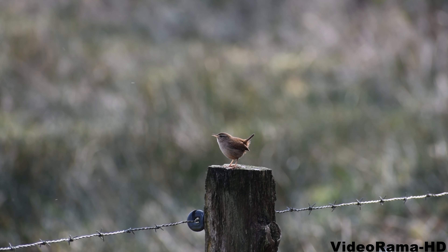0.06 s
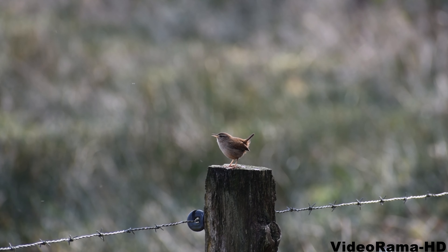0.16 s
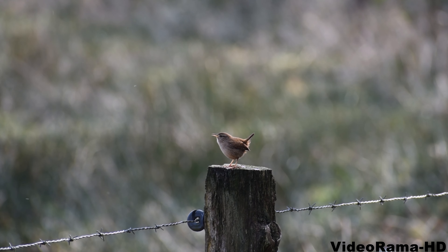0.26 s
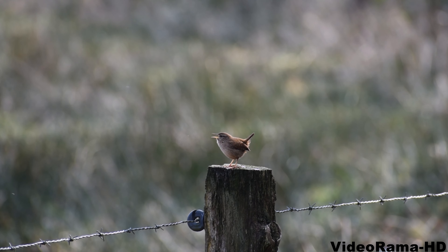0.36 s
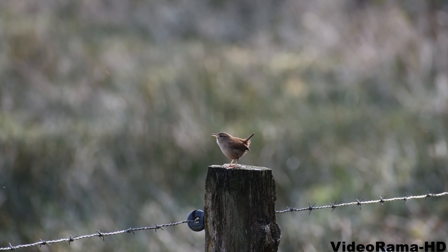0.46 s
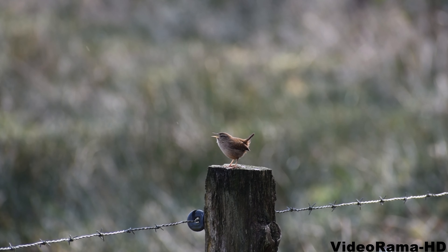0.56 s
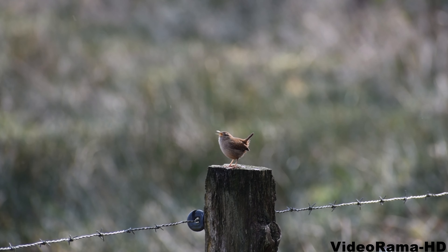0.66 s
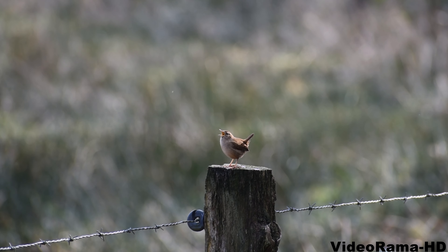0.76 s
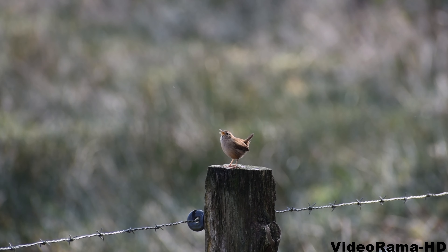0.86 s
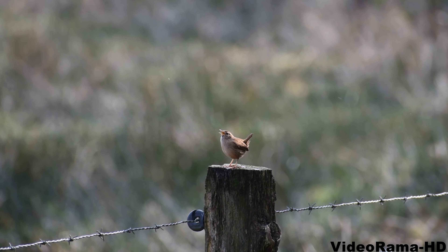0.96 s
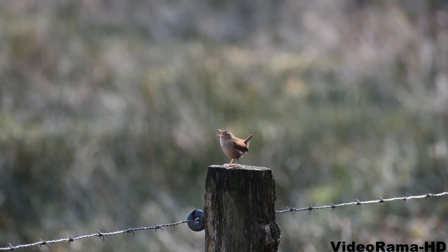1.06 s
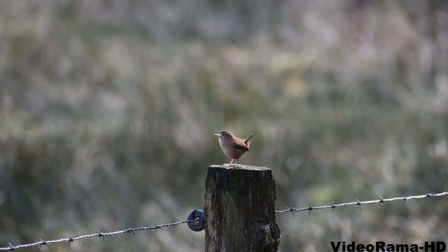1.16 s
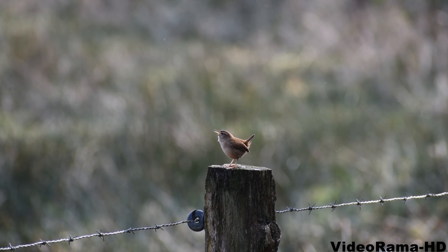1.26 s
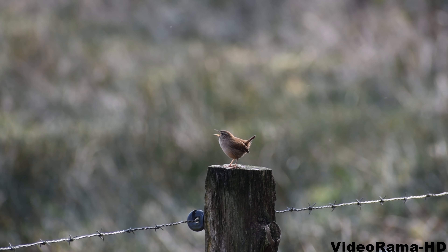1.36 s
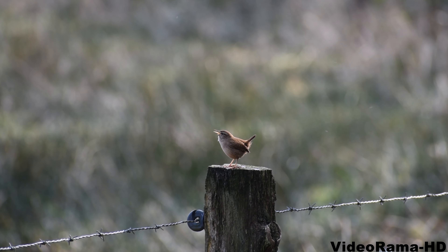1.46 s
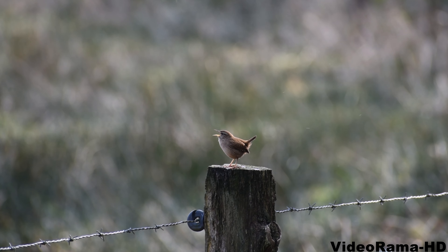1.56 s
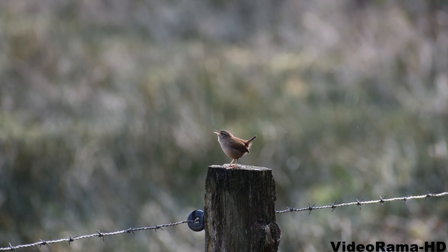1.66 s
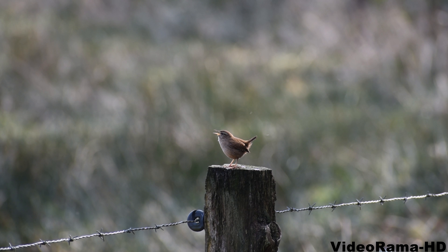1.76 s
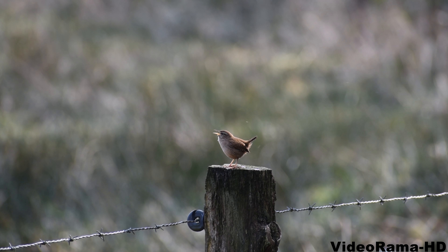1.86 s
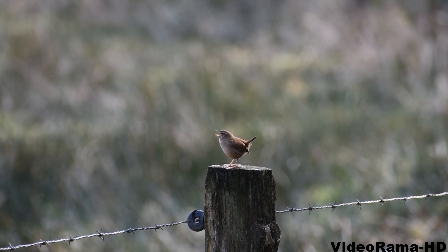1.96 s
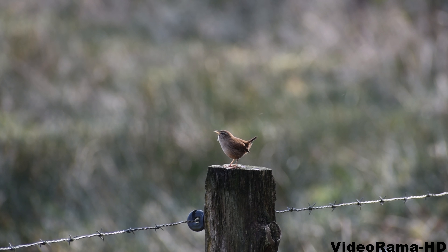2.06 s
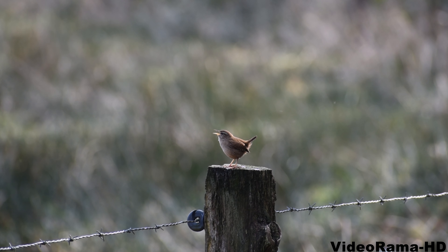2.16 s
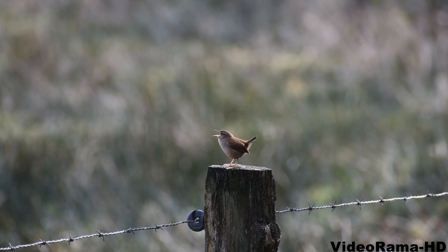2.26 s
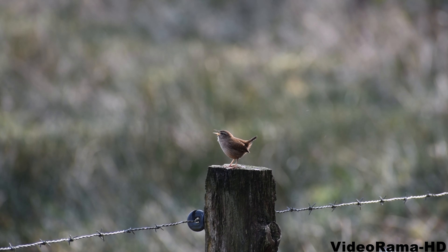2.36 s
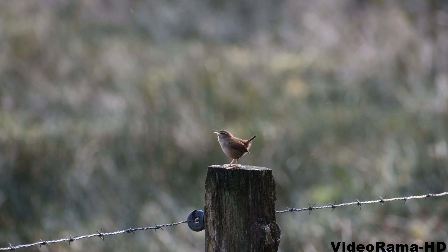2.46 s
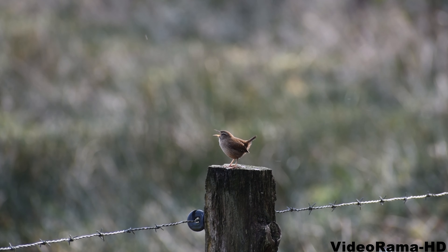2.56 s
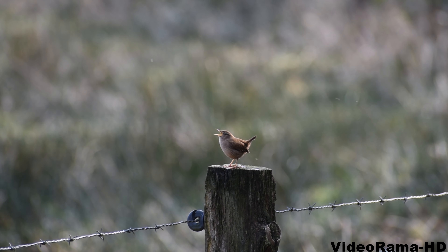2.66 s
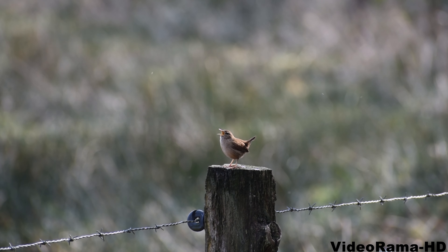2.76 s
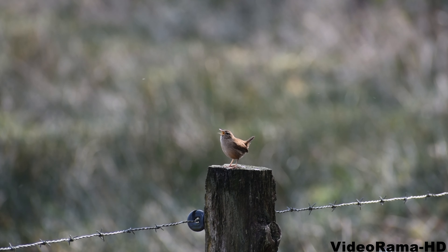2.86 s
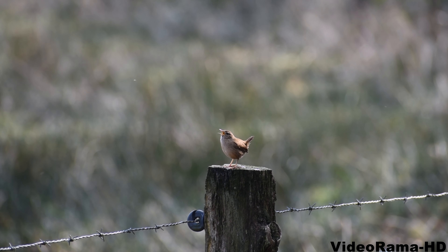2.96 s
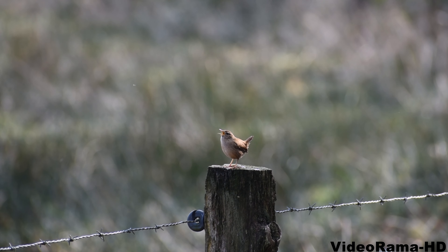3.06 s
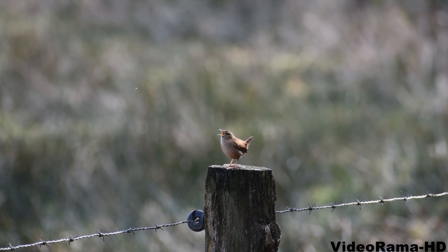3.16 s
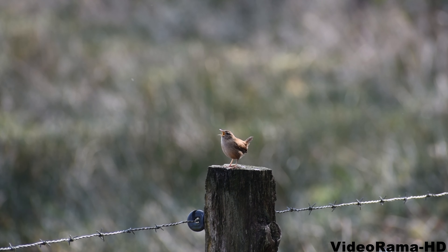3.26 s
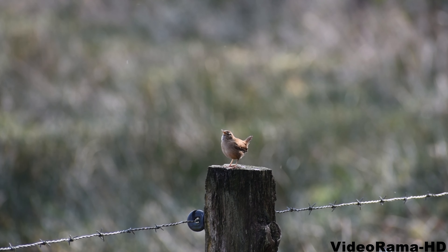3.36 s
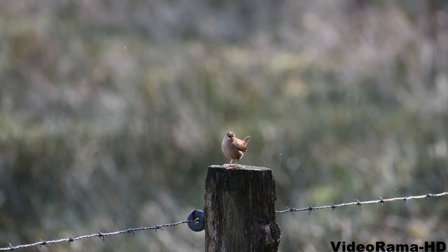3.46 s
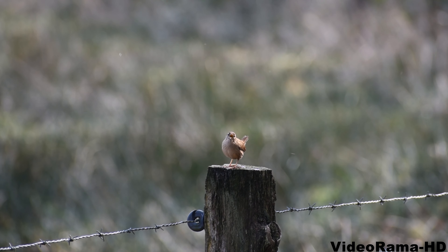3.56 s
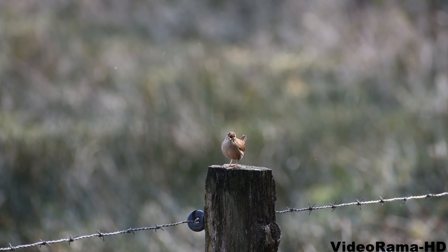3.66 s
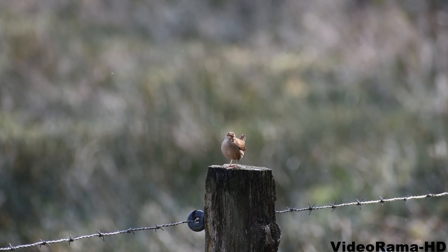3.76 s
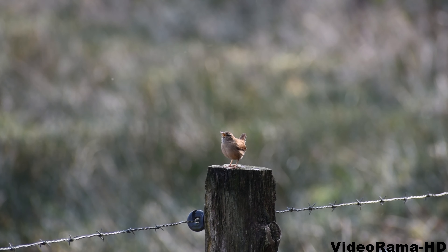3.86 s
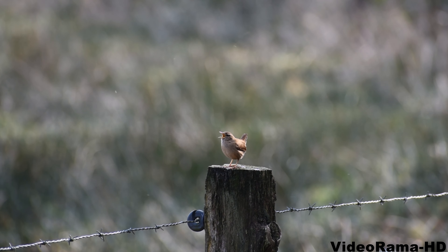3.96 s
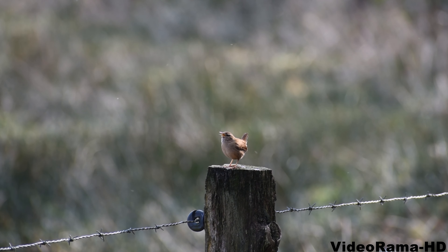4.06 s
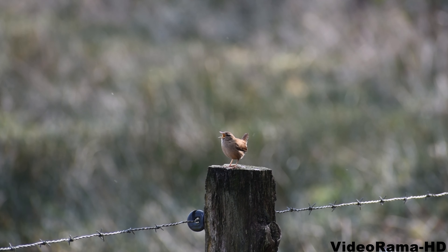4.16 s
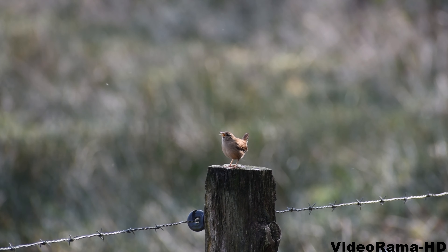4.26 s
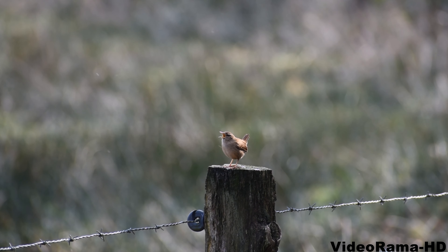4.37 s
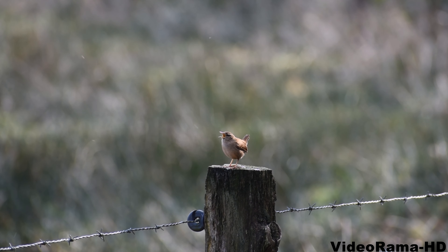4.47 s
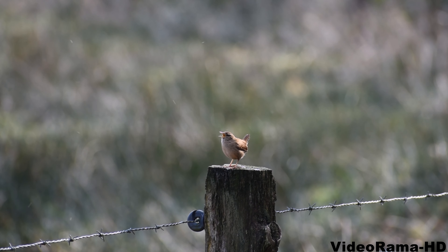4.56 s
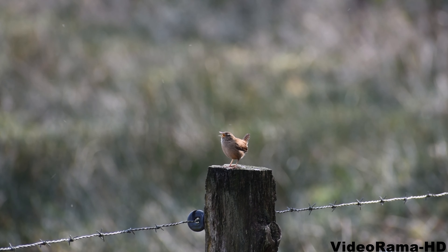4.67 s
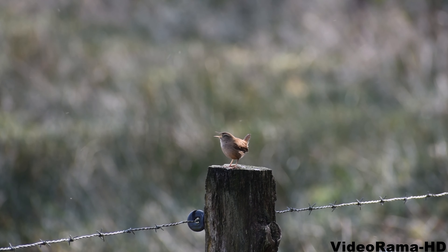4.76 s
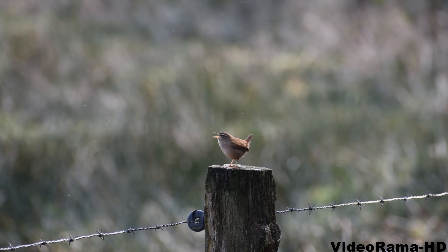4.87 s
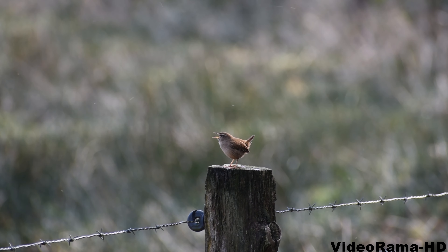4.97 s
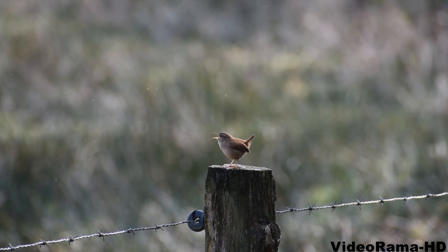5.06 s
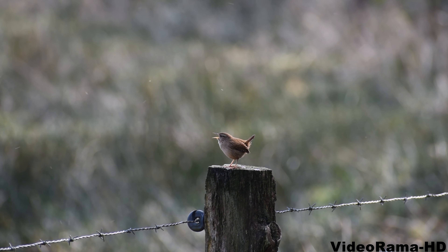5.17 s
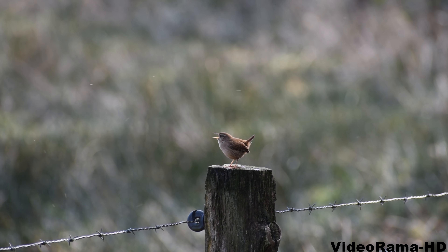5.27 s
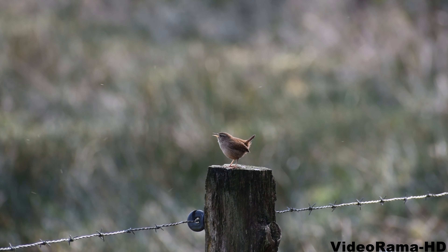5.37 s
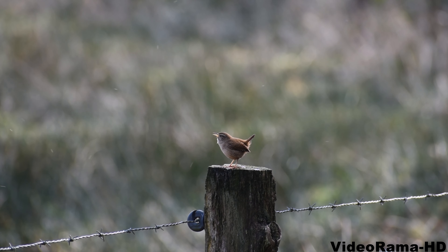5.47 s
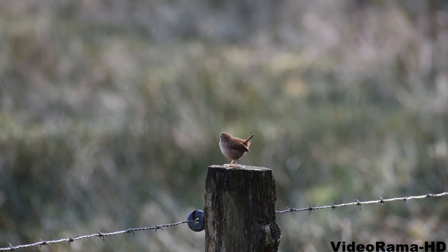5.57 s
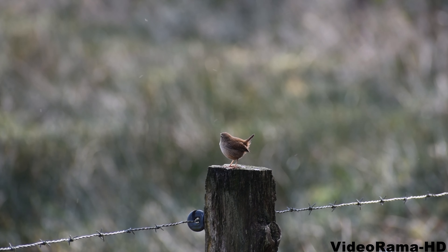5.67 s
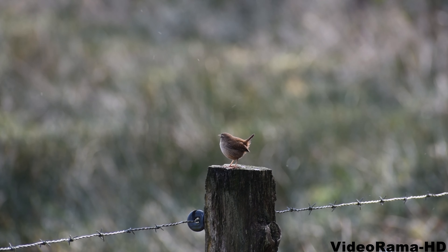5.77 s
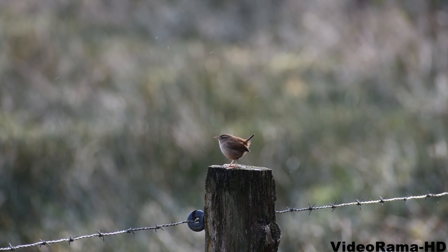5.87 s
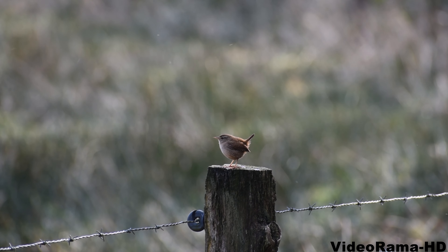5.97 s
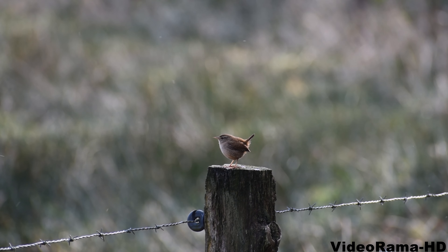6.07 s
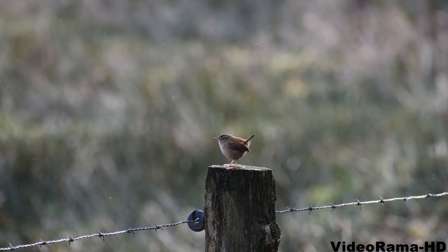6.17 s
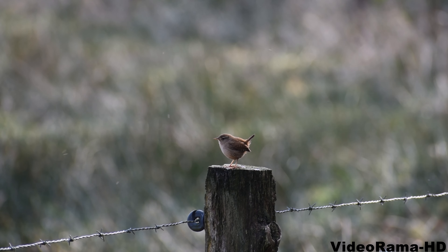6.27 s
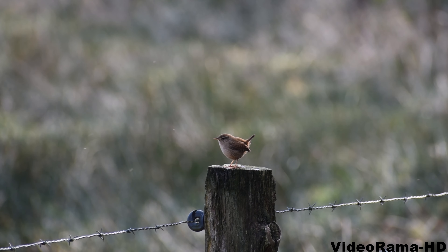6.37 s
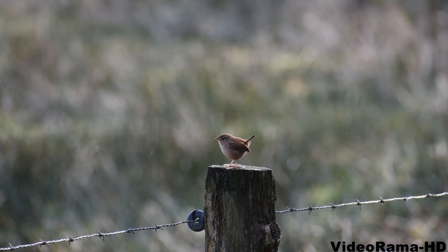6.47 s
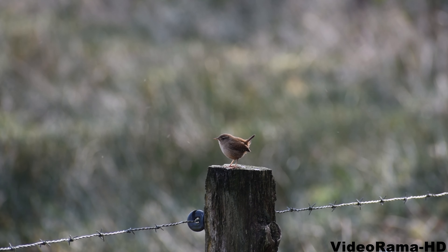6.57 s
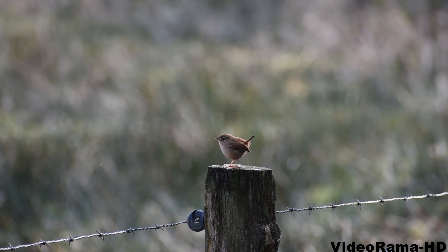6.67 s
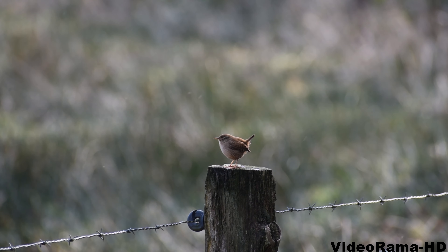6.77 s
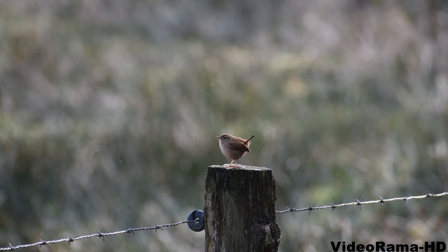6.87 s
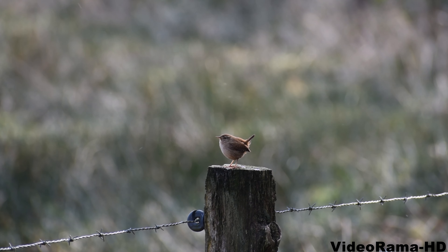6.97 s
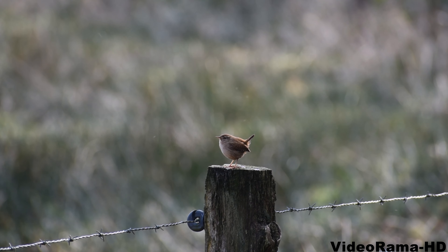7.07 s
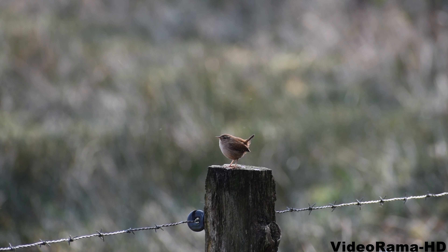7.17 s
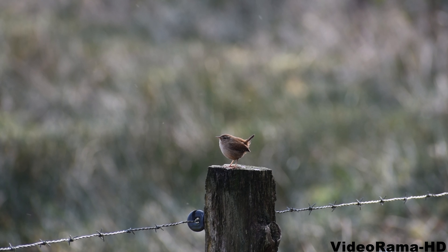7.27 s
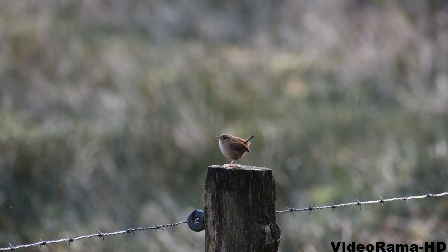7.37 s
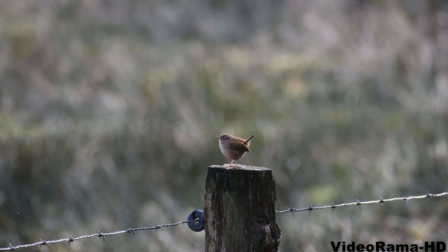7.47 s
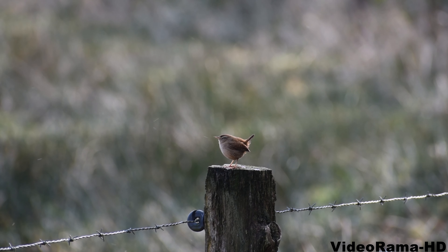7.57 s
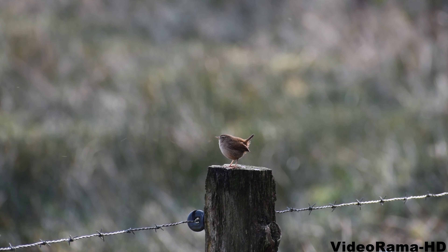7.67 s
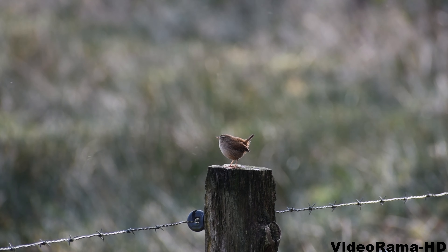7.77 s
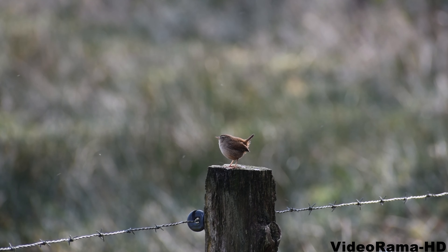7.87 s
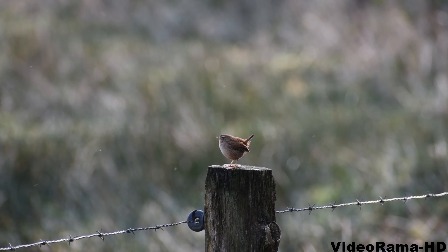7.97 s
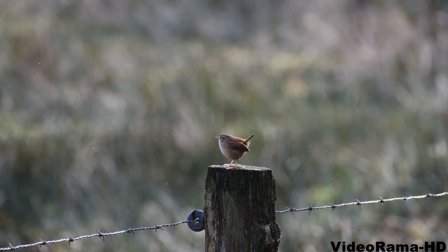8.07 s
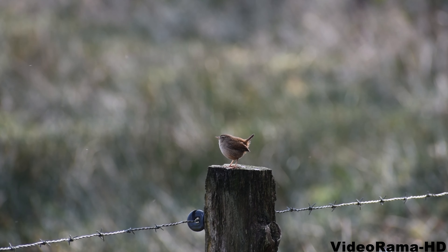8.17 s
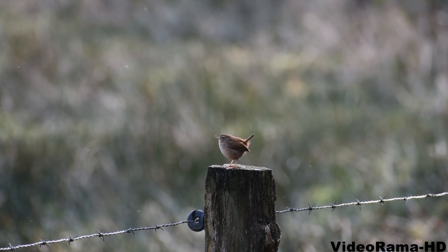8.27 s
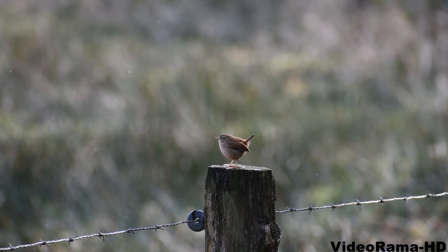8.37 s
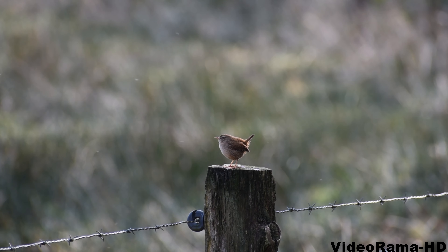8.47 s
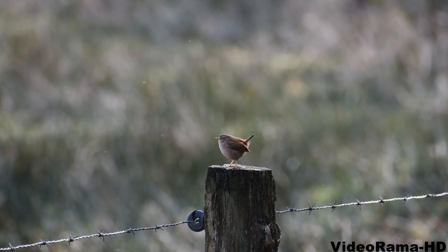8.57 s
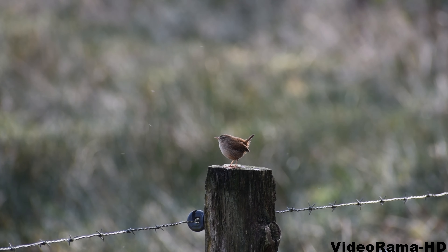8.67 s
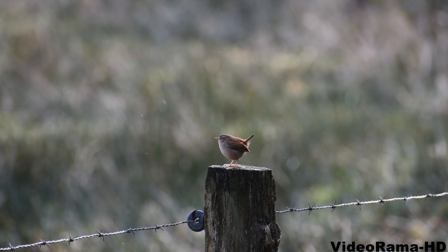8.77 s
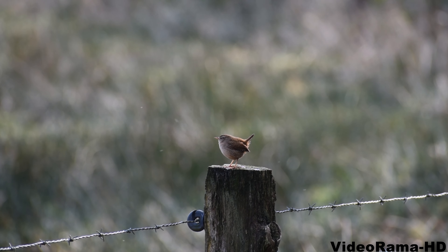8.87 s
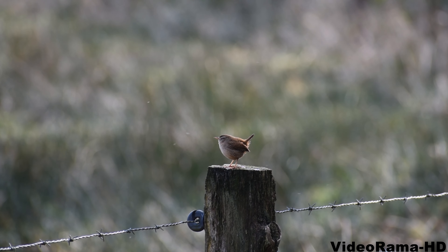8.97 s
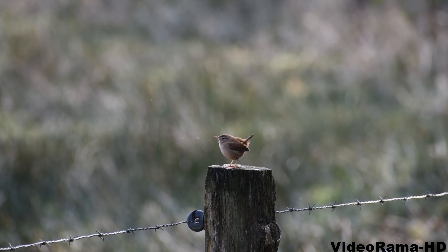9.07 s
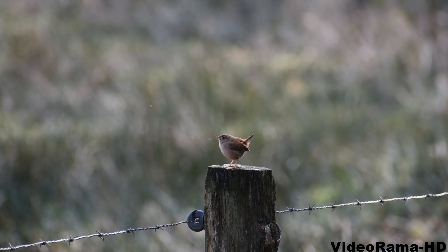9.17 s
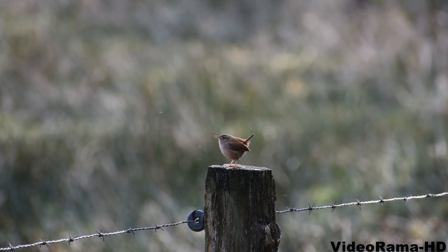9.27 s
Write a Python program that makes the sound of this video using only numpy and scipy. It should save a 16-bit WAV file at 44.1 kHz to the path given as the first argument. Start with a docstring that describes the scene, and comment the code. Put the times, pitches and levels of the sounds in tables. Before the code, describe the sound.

Piercing fast birdsong pours out for over five seconds, then softer distant replies continue in an open field with low, far traffic hum.

```python
"""A near wren whistles a long song of slurs, a rattle and a trill; a second wren answers from further off,
a third faintly beyond. Some low chirps join in; a distant road drones below, its tyre hiss swelling.
Birds are gated near sines along pitch and level tracks, with fast sweeps for the near wren's flicks.
Hedges and trees are decaying noise echoes, the road is coloured noise.
Two close microphone ports hear it all, the left one a hair later, each with its own hiss."""
import sys
import numpy as np
from scipy import signal
from scipy.fft import rfft, irfft, next_fast_len
from scipy.io import wavfile
from scipy.ndimage import uniform_filter1d

SR = 44100
rng = np.random.default_rng(int(sys.argv[2]) if len(sys.argv) > 2 else 0)


def file_out(sig):
    """Save sig as 16-bit WAV at sys.argv[1]."""
    # one column per channel
    cols = np.atleast_2d(sig).T
    # limit, then scale
    lim = np.clip(cols, -1, 1)
    pcm = np.round(lim * 32767).astype(np.int16)
    wavfile.write(sys.argv[1], SR, pcm)


N = 411012

# Colour of the port hiss. Each row: frequency in Hz, relative density in dB.
HISS_COLOUR = [(1000, -25.5), (3000, -16), (6000, -4.5), (10000, -11.5), (15800, -19.5)]
# Colour of the road drone. Each row: frequency in Hz, relative density in dB.
ROAD_COLOUR = [(25, -24.5), (55, -18.5), (170, -17.5), (330, -9), (830, -3.5), (1400, -7), (2070, -13),
               (3200, -14.5), (6400, -16), (8000, -25), (15800, -32.5)]
# Swells of the passing traffic. Each row: time in seconds, drone level in dB, tyre hiss level in dB.
ROAD_LEVELS = [(0, -55.5, -64), (1.199, -57.5, -81.5), (2.401, -57.5, -61.5), (3, -57.5, -82),
               (4.002, -56.5, -69.5), (5.5, -58, -88), (8, -57.5, -83), (9, -57, -67)]
# Low chirps of other small birds. Each row: start in seconds, length in seconds, first pitch in Hz,
# share of the length at the peak (0-1), peak pitch in Hz, last pitch in Hz, level at the peak in dB.
CHIRP_SLURS = [(3.355, 0.084, 2860, .4, 2680, 2870, -64), (3.54, 0.13, 3050, 0.5, 2590, 2900, -67),
               (4.972, 0.039, 4750, .5, 4050, 3450, -51), (5.157, 0.033, 3760, 0.27, 3830, 3980, -51.5),
               (5.2351, 0.03, 3650, 0.6, 3830, 3980, -51.5), (5.306, 0.035, 3560, 0.3, 3860, 4150, -48.5),
               (5.3733, 0.033, 3480, 0.44, 3800, 4020, -51.5), (5.4536, .034, 3420, 0.7, 3900, 3970, -52),
               (6.284, .037, 2220, .3, 2230, 2260, -62), (6.519, 0.13, 1850, 0.57, 1800, 1810, -60.5),
               (7.248, 0.013, 3950, .55, 3380, 3290, -48.5), (7.269, 0.04, 2460, 0.17, 2360, 2140, -54)]
# One buzzy low call. Columns as for the chirps.
BUZZ_SLURS = [(4.862, 0.077, 3630, 0.54, 3840, 3920, -52.5)]
# Thin drops of the third wren. Each row: start in seconds, level at the peak in dB.
THIRD_WREN_DROPS = [(6.15, -62), (6.222, -63), (6.259, -61), (7.783, -58), (7.878, -59), (7.972, -60),
                    (8.087, -60)]
# Contours of repeated syllables, by name. Each row: share of the length (0-1),
# height between low and high pitch (0-1), level relative to the syllable's in dB.
SYLLABLE_SHAPES = { "rise": [(0, 0.05, -16.5), (.19, 0.35, -3.5), (.45, 0.48, -1.5), (.68, .7, -2),
                   (.86, .92, 0.5), (1, 1, -11)], "tick": [(0, 1, -21), (.27, .26, -4.5), (.43, 0, 1.5),
                   (.8, .24, -5.5), (1, 0.76, -17)], "scoop": [(0, 0, -24.5), (.12, 0.67, -3.5),
                   (.24, 0.9, -6), (.52, .8, -1), (.75, 0.99, -2), (1, 0.95, -8)], "plunge": [(0, 1, -20),
                   (.2, .45, -4), (.32, .22, 1), (.5, .17, -9), (.65, .11, -6.5), (.85, .02, -9),
                   (1, 0, -9.5)], "hook": [(0, .62, -17), (.045, .92, -3), (.095, 0.98, -1),
                   (.2, .92, -20.5), (.36, .89, -13), (.49, .84, -0.5), (.6, .62, -1.5), (.73, 0.26, -9),
                   (.84, .1, -13), (.94, 0.02, -18.5), (1, 0.03, -21.5)], "fall": [(0, 0.94, -12),
                   (.1, 0.7, -2.5), (.22, .55, -4.5), (.52, 0.4, -1), (1, 0, -7.5)],
                   "step": [(0, 0.99, -24), (.27, .55, -2.5), (.69, .49, -8.5), (.92, .06, 0.5),
                   (1, 0, -20)], "climb": [(0, 0.06, -9.5), (.26, .27, -1), (.6, .68, -11), (.84, .98, -9),
                   (1, 0.88, -13)], "dome": [(0, 0, -3.5), (.13, .72, 1), (.3, 0.93, -7), (.72, .93, -6.5),
                   (1, 0.6, -2)], }
# Syllables of the answering wren, by shape. Each row: start in seconds, length in seconds,
# low pitch in Hz, high pitch in Hz, level in dB.
ANSWER_SYLLABLES = { "fall": [(5.669, 0.049, 3570, 7000, -49)], "plunge": [(8.154, .1, 3770, 6350, -45.5),
                    (8.309, 0.095, 3710, 7100, -45.5)], "step": [(6.314, .103, 4440, 6990, -45.5),
                    (6.476, .099, 4330, 7060, -43)], "climb": [(6.8858, 0.04, 4410, 6970, -45),
                    (7.0086, .031, 4600, 6860, -43.5), (7.1248, 0.04, 4490, 6820, -43.5),
                    (7.239, 0.035, 4450, 6850, -44.5), (7.356, 0.036, 4220, 6700, -47.5),
                    (7.4735, 0.039, 4500, 6650, -47.5)], "tick": [(6.9352, 0.03, 7770, 8500, -58),
                    (7.0525, 0.028, 7820, 8300, -57), (7.1712, 0.02, 7960, 8480, -54),
                    (7.2854, 0.02, 7420, 8240, -51.5), (7.4007, 0.017, 7000, 7700, -51),
                    (7.5189, 0.017, 7420, 7760, -51)], "dome": [(8.8758, 0.1, 6340, 7880, -52),
                    (9.0385, 0.12, 5780, 7940, -52.5), (9.2051, 0.13, 5600, 7900, -53)], }
# Plain slurs of the answering wren. Columns as for the chirps.
ANSWER_SLURS = [ (0.053, 0.052, 4660, 0.7, 4670, 4670, -53), (1.8817, .025, 7130, .2, 7100, 6960, -48),
                (5.079, 0.053, 6170, 0.6, 4800, 4770, -56), (5.549, 0.064, 7530, .3, 6940, 7770, -49),
                (5.789, 0.15, 6480, 0.43, 5750, 5940, -53.5), (6.093, .018, 6770, .2, 7000, 7880, -54.5),
                (6.121, 0.024, 8340, .52, 7180, 6990, -54), (6.2019, 0.034, 3800, 0.74, 4050, 4460, -48.5),
                (6.589, .042, 4020, .6, 3980, 3960, -61), (6.6284, 0.051, 7650, 0.45, 8950, 8840, -59.5),
                (6.698, 0.024, 8500, .75, 8040, 7950, -53), (6.69, .025, 5940, .6, 6760, 6200, -63),
                (6.774, 0.057, 6840, 0.4, 5550, 5470, -47), (7.199, .017, 4470, 0.56, 4190, 4250, -54),
                (7.5818, 0.018, 4260, 0.8, 4000, 3930, -51.5), (7.6566, 0.037, 6850, .6, 7200, 7050, -51.5),
                (7.688, .09, 7100, 0.13, 6990, 7280, -48), (7.7983, .016, 7720, .54, 6870, 6770, -57),
                (7.8257, 0.022, 4260, 0.25, 4220, 3830, -50.5), (7.76, .014, 6500, .6, 7400, 8000, -58),
                (7.774, 0.013, 8100, .7, 6900, 6400, -49), (7.8871, 0.078, 5100, 0.41, 4980, 5000, -47),
                (8.0068, 0.12, 3970, 0.32, 3746, 3830, -49.5), (8.4877, 0.15, 7540, 0.23, 6950, 6630, -50),
                (8.615, 0.0466, 6500, .6, 6870, 6730, -50.5), (8.419, 0.053, 6500, 0.5, 6900, 7300, -66),
                (8.7217, 0.092, 4840, .22, 4616, 4470, -46.5), (8.765, 0.055, 4450, .4, 4200, 4200, -60)]
# Syllables of the near wren, by shape. Columns as for the answering wren's syllables.
WREN_SYLLABLES = { "fall": [(0.5034, .029, 4125, 5900, -30), (2.1848, 0.024, 4150, 6530, -22)],
                  "hook": [(1.3973, 0.13, 3590, 6584, -19.5), (1.5844, 0.14, 3610, 6590, -20)],
                  "rise": [(2.5986, 0.033, 3680, 5350, -25), (2.7148, 0.029, 3640, 5610, -24),
                  (2.8336, 0.026, 3650, 5550, -22.5), (2.9486, 0.024, 3720, 5550, -23),
                  (3.0635, .03, 3850, 5950, -20), (3.1848, 0.031, 3890, 5860, -20),
                  (3.307, 0.032, 3830, 6210, -20.5)], "tick": [(2.6463, .014, 7370, 8430, -29),
                  (2.7607, .0145, 7530, 8760, -24), (2.8795, 0.016, 7340, 8470, -24.5),
                  (2.995, 0.015, 7530, 8420, -26.5), (3.1097, 0.015, 7120, 8360, -20),
                  (3.234, 0.014, 7560, 8530, -22.5), (3.3549, 0.014, 7540, 8620, -23.5)],
                  "scoop": [(0.676, .048, 3290, 4236, -31), (0.9593, 0.055, 3250, 4190, -28)], }
# Single notes of the near wren, one list each. Each row: time in seconds, pitch in Hz, level in dB.
SINGLE_NOTES = [
    [(0.245, 5070, -58), (0.255, 4780, -41.5), (0.265, 4257, -35.5), (0.277, 3980, -45.5),
     (0.313, 3817, -39.5), (0.324, 3900, -49.5)],
    [(0.382, 5460, -51), (0.392, 5430, -32.5), (0.414, 5340, -29), (0.44, 5600, -32), (0.445, 5570, -41)],
    [(0.577, 7500, -50), (0.587, 7530, -31.5), (0.597, 6710, -21), (0.603, 6450, -27.5), (0.613, 7040, -21),
     (0.626, 7600, -36.5)],
    [(0.807, 7580, -42), (0.825, 7280, -24.5), (0.841, 7120, -21.5), (0.863, 7223, -21),
     (0.881, 6906, -18.5), (0.899, 6882, -18), (0.906, 6800, -32)],
    [(1.07, 7600, -39.5), (1.088, 7301, -24), (1.106, 6985, -17), (1.138, 6980, -17), (1.158, 6710, -25.5),
     (1.18, 6740, -19), (1.187, 6530, -29.5)],
    [(1.244, 5600, -43.5), (1.254, 5120, -27), (1.268, 5060, -22), (1.29, 4930, -27.5),
     (1.312, 4200, -28.5), (1.336, 3700, -37), (1.344, 3740, -43)],
    [(2.033, 6700, -49), (2.039, 7180, -30.5), (2.047, 7370, -27), (2.059, 8230, -38), (2.067, 7916, -29.5),
     (2.079, 7110, -22.5), (2.088, 7130, -32.5)],
    [(2.263, 6620, -39), (2.271, 7190, -26), (2.279, 7080, -20.5), (2.297, 5845, -18.5),
     (2.317, 5560, -20.5), (2.345, 5980, -23), (2.359, 6070, -31)],
    [(2.423, 4550, -47), (2.431, 4460, -36), (2.441, 4140, -29), (2.455, 4280, -28), (2.483, 4200, -28.5),
     (2.499, 3973, -32), (2.523, 3880, -34.5), (2.534, 3680, -40.5)],
    [(3.478, 6430, -43), (3.484, 6880, -30.5), (3.496, 7640, -24.5), (3.516, 7480, -25), (3.542, 8135, -29),
     (3.582, 8190, -33), (3.61, 7924, -32.5), (3.628, 6938, -22.5), (3.637, 6690, -30)],
    [(3.735, 5400, -38), (3.745, 5656, -19), (3.779, 5715, -20), (3.789, 5800, -18), (3.796, 6050, -33.5)],
    [(3.857, 4530, -49), (3.867, 4310, -30), (3.885, 4143, -26), (3.923, 4073, -28.5), (3.939, 4005, -31),
     (3.945, 3940, -46)],
    [(4.006, 6760, -38.5), (4.012, 6522, -24.5), (4.024, 5750, -20), (4.04, 5210, -21.5),
     (4.068, 5410, -24.5), (4.08, 5087, -29), (4.094, 4337, -28.5), (4.11, 3901, -32.5), (4.119, 3740, -41)],
    [(4.184, 6530, -37.5), (4.19, 6360, -23.5), (4.208, 5576, -17.5), (4.25, 5510, -24.5),
     (4.26, 5110, -25), (4.274, 4330, -27), (4.282, 4000, -37), (4.292, 3840, -35), (4.303, 3687, -39)],
    [(4.366, 7301, -61), (4.372, 7600, -41), (4.378, 7900, -34), (4.396, 8050, -32.5), (4.456, 7717, -27),
     (4.472, 7820, -28), (4.552, 7295, -27), (4.576, 7220, -41)],
    [(4.637, 5350, -42), (4.647, 5180, -27), (4.667, 4910, -22.5), (4.697, 4850, -27), (4.731, 5040, -28),
     (4.741, 4860, -31), (4.746, 4850, -41)],
    [(5.482, 6550, -43), (5.49, 6080, -28), (5.498, 5540, -24), (5.53, 4220, -33), (5.554, 3719, -38.5),
     (5.568, 3620, -47)],
]
# Plain slurs of the near wren. Columns as for the chirps.
NEAR_SLURS = [(0.001, .04, 7120, 0.4, 6360, 5600, -40), (0.097, 0.027, 5090, 0.44, 5094, 5160, -37),
              (0.165, 0.015, 6840, 0.4, 7700, 8200, -60), (0.179, .02, 8200, 0.84, 7300, 7140, -49.5),
              (0.719, 0.014, 4240, .5, 4450, 4780, -28), (2.1157, .027, 3570, 0.5, 3890, 3330, -40.5),
              (3.4098, 0.028, 3850, 0.33, 4100, 3530, -31.5), (3.6751, .024, 4060, 0.22, 4320, 3630, -31)]
# Very short flicks of the near wren. Each row: start in seconds, length in seconds,
# first pitch in Hz, middle pitch in Hz, last pitch in Hz, peak in dB.
SHORT_FLICKS = [(0.4905, 0.011, 3250, 5040, 5700, -34), (0.652, 0.011, 4360, 5230, 3640, -30.5),
                (0.932, 0.0078, 3570, 4790, 3900, -30), (2.168, 0.014, 3530, 5080, 6500, -28.5)]
# Rattle of straight downward flicks. Each row: start in seconds, length in seconds,
# top pitch in Hz, bottom pitch in Hz, peak in dB.
RATTLE_FLICKS = [(1.766, 0.0061, 7960, 3700, -33.5), (1.801, 0.0091, 7730, 3540, -32.5),
                 (1.8395, 0.0078, 7230, 3650, -34.4), (1.881, .0072, 7440, 3760, -33.5),
                 (1.909, .0073, 7300, 4450, -36), (1.95, .0077, 7540, 3350, -32.5),
                 (1.98, .0076, 6130, 4080, -37), (2.0066, .011, 6160, 3630, -37.5)]
# Arches: a loud upward leap into a quiet crown that swells as it droops. Each row: start in seconds,
# leap in seconds, length in seconds, share of the length at the top (0-1), top pitch in Hz,
# last pitch in Hz, leap level in dB, crown level in dB, droop level in dB.
ARCH_ROWS = [(4.8015, .02, 0.12, 0.21, 8470, 6970, -19, -41, -30),
             (4.9593, 0.017, 0.12, 0.4, 8150, 7200, -21, -39.5, -36.5),
             (5.1288, .021, 0.1284, 0.4, 8250, 7210, -20, -37, -29.5),
             (5.31, 0.03, .108, 0.52, 7960, 7370, -19.5, -36, -35.5)]
# Contour of the leap. Each row: share of the leap (0-1), pitch in Hz, level relative to the leap's in dB.
LEAP_CONTOUR = [(0, 5030, -21), (.12, 5680, -9.5), (.3, 6100, -5.5), (.48, 6560, 0.5), (1, 7760, -9)]

LEFT_LAG_SAMPLES, TOP_HZ = 1, 15800
# A grace flick leads every rise of the trill.
GRACE_LEAD_S, GRACE_S, GRACE_REL_DB = 0.0142, 0.0073, -7
# Arch droop: share of the length where loudest, share of the sinking done there, relative end level.
DROOP_AT, DROOP_SHARE, CLOSE_REL_DB = 0.94, 0.7, -4.5
# After the leap: time, share of the climb to the top, level relative to the crown.
SETTLE_S, SETTLE_SHARE, SETTLE_REL_DB = 0.012, 0.55, 5
# Partway from crown to droop: share of the time, of the sinking, of the swell.
BOW_SHARES = [0.6, 0.24, 0.28]


def undb(db):
    """Decibels to gain."""
    return 10 ** (np.asarray(db) / 20)


def coloured(spectrum):
    """Gaussian noise filtered to (Hz, dB) points, then scaled to rms 1."""
    hz, db = np.transpose(spectrum)
    size = next_fast_len(N)
    bin_hz = np.fft.rfftfreq(size, 1 / SR) + 1  # + 1 avoids log(0)
    gain = undb(np.interp(np.log(bin_hz), np.log(hz), db))
    noise = irfft(rfft(rng.standard_normal(size)) * gain, size)[:N]
    return noise / noise.std()


def walk(rate_hz):
    """Random values drawn at rate_hz and smoothed over one interval."""
    hold = int(SR / rate_hz)
    steps = np.repeat(rng.standard_normal(N // hold + 1), hold)
    return uniform_filter1d(steps, hold)[:N]


def road():
    """A steady drone, and a narrower tyre hiss that comes up with far vehicles."""
    s, drone_db, tyre_db = np.transpose(ROAD_LEVELS)
    t = np.arange(N) / SR
    drone = coloured(ROAD_COLOUR) * undb(np.interp(t, s, drone_db))
    tyres = coloured([(900, -29.5), (1400, -2.0), (2400, -27.5)])
    return drone + tyres * undb(np.interp(t, s, tyre_db))


def hedges(x, near_db, near_t60_s, far_db, far_t60_s, treble_t60_s=0.71):
    """Scatter from leaves close by dies fast; the tree line returns a long dim tail."""
    t = np.arange(SR) / SR
    decay = undb(near_db - 60 * t / near_t60_s) + undb(far_db - 60 * t / far_t60_s)
    patchy = undb(2.5 * walk(60)[:SR])  # bushes stand at uneven distances
    onset = np.clip(t / 0.0079, 0, 1) ** 2
    echoes = rng.standard_normal(SR) * decay * patchy * onset
    # air and leaves take the highest notes out of the longer paths
    low = signal.sosfiltfilt(signal.butter(2, 6000, fs=SR, output="sos"), echoes)
    echoes = low + (echoes - low) * undb(-60 * t / treble_t60_s)
    return signal.fftconvolve(x, echoes)[:N]


def whistle(notes, edge_s, waver):
    """The syrinx makes a near sine that opens and shuts within edge_s, with a faint octave above."""
    out = np.zeros(N)
    unsteady = 1 + waver * (walk(400) + walk(90))
    for note in notes:
        s, hz, db = np.transpose(note)
        first = max(int((s[0] - edge_s) * SR), 0)
        last = min(int((s[-1] + edge_s) * SR), N)
        i = np.arange(first, last)
        t = i / SR
        gate = np.clip(np.minimum(t - s[0], s[-1] - t) / edge_s + 1, 0, 1) ** 2
        pitch_hz = np.interp(t, s, hz)
        phase = 2 * np.pi * np.cumsum(pitch_hz * unsteady[i]) / SR
        # breath pressure changes smoothly
        swell = undb(uniform_filter1d(np.interp(t, s, db), int(edge_s * SR)))
        octave_gain = undb(-9 - 0.008 * pitch_hz)  # weaker on high notes
        tone = np.sin(phase) + octave_gain * np.sin(2 * phase)
        out[i] += np.sqrt(2) * gate * swell * tone
    return out


def slurs(rows, start_db, end_db, shoulder):
    """Pitch runs straight to a turn at the loudest point and on; the level swells fast and rounds off."""
    notes = []
    for s, length_s, first_hz, at, peak_hz, last_hz, db in rows:
        share = np.array([0, at / 2, at, (1 + at) / 2, 1])
        rel_db = np.array([start_db, shoulder * start_db, 0, shoulder * end_db, end_db])
        hz = np.interp(share, [0, at, 1], [first_hz, peak_hz, last_hz])
        notes.append(np.c_[s + length_s * share, hz, db + rel_db])
    return notes


def sung(song):
    """Stretch each shape to the length, pitch range and level of its syllables."""
    notes = []
    for name, rows in song.items():
        share, height, rel_db = np.transpose(SYLLABLE_SHAPES[name])
        for s, length_s, low_hz, high_hz, db in rows:
            hz = low_hz + height * (high_hz - low_hz)
            notes.append(np.c_[s + length_s * share, hz, db + rel_db])
    return notes


def chirps():
    """Low whistled chirps, and one call made buzzy by a stronger pitch waver."""
    plain = slurs(CHIRP_SLURS, start_db=-8, end_db=-12, shoulder=0.35)
    buzzy = slurs(BUZZ_SLURS, start_db=-9, end_db=-8, shoulder=0.3)
    return whistle(plain, edge_s=0.0072, waver=0.02) + whistle(buzzy, edge_s=0.007, waver=0.045)


def third_wren():
    """Faint whistles of falling pitch, all on one contour."""
    rows = [(s, 0.023, 6400, 0.5, 5840, 5150, db) for s, db in THIRD_WREN_DROPS]
    drops = slurs(rows, start_db=-5, end_db=-5, shoulder=0.3)
    return whistle(drops, edge_s=0.0072, waver=0.0056)


def answering_wren():
    """Repeated syllables and plain slurs, whistled with softer edges than the near wren's."""
    song = sung(ANSWER_SYLLABLES)
    song += slurs(ANSWER_SLURS, start_db=-11.5, end_db=-10, shoulder=0.45)
    return whistle(song, edge_s=0.0072, waver=0.0056)


def flicks():
    """Each flick is one fast sine sweep or pitch arch under a smooth bump."""
    out = np.zeros(N)
    rattle = [(s, length_s, top_hz, (top_hz + bottom_hz) / 2, bottom_hz, db)
              for s, length_s, top_hz, bottom_hz, db in RATTLE_FLICKS]
    graces = [(s - GRACE_LEAD_S, GRACE_S, 3340, 4480, 4140, db + GRACE_REL_DB)
              for s, _, _, _, db in WREN_SYLLABLES["rise"]]
    for s, length_s, first_hz, middle_hz, last_hz, db in SHORT_FLICKS + rattle + graces:
        n, at = int(length_s * SR), int(s * SR)
        bend = np.polyfit([0, 0.5, 1], [first_hz, middle_hz, last_hz], 2)
        pitch_hz = np.polyval(bend, np.linspace(0, 1, n))
        phase = 2 * np.pi * np.cumsum(pitch_hz) / SR
        out[at:at + n] += undb(db) * np.hanning(n) * np.sin(phase)
    return out


def arches():
    """One leap contour for all, then a crown whose pitch peaks and droops."""
    notes = []
    for s, leap_s, length_s, at, top_hz, last_hz, leap_db, crown_db, droop_db in ARCH_ROWS:
        leap = [(s + leap_s * share, hz, leap_db + rel_db) for share, hz, rel_db in LEAP_CONTOUR]
        leap_end_s, leap_end_hz, _ = leap[-1]
        crown = np.array([s + at * length_s, top_hz, crown_db])
        droop_hz = top_hz + DROOP_SHARE * (last_hz - top_hz)
        droop = np.array([s + DROOP_AT * length_s, droop_hz, droop_db])
        settle_s = min(leap_end_s + SETTLE_S, crown[0])
        settle_hz = leap_end_hz + SETTLE_SHARE * (top_hz - leap_end_hz)
        settle = (settle_s, settle_hz, crown_db + SETTLE_REL_DB)
        bow = crown + (droop - crown) * BOW_SHARES
        close = (s + length_s, last_hz, droop_db + CLOSE_REL_DB)
        notes.append(leap + [settle, crown, bow, droop, close])
    return notes


def near_wren():
    """Whistled syllables, arches, single notes and slurs with crisp edges, plus the flicks."""
    song = sung(WREN_SYLLABLES) + arches() + list(SINGLE_NOTES)
    song += slurs(NEAR_SLURS, start_db=-13, end_db=-8, shoulder=0.32)
    return whistle(song, edge_s=0.0013, waver=0.0042) + flicks()


def scene():
    """The birds with their scatter and the road reach the right port first."""
    small_birds = chirps()
    far_wrens = answering_wren() + third_wren()
    wren = near_wren()
    field = road()
    field += small_birds + hedges(small_birds, -35.5, 0.12, -44, 0.89)
    field += far_wrens + hedges(far_wrens, -37.0, 0.31, -46.5, 0.9)
    field += wren + hedges(wren, -49.5, 0.23, -49, 0.69)
    left = np.r_[np.zeros(LEFT_LAG_SAMPLES), field[:-LEFT_LAG_SAMPLES]]
    return np.array([left, field])


def record(dry):
    """Each port adds its own hiss; the top is cut steeply."""
    hiss = np.array([coloured(HISS_COLOUR), coloured(HISS_COLOUR)]) * undb(-72.0)
    steep_cut = signal.ellip(10, 0.2, 60, TOP_HZ, fs=SR, output="sos")
    return signal.sosfilt(steep_cut, dry + hiss)


dry = scene()
out = record(dry)
file_out(out)
```